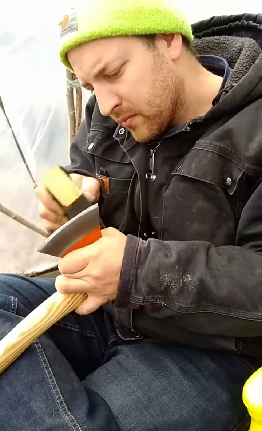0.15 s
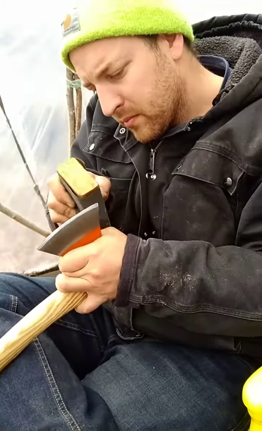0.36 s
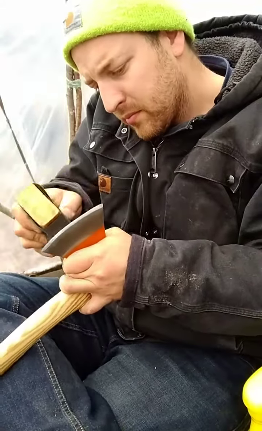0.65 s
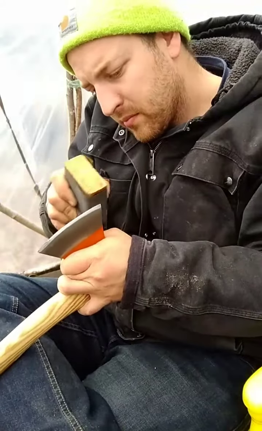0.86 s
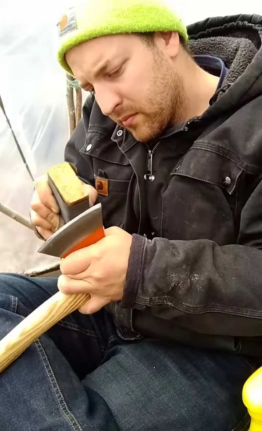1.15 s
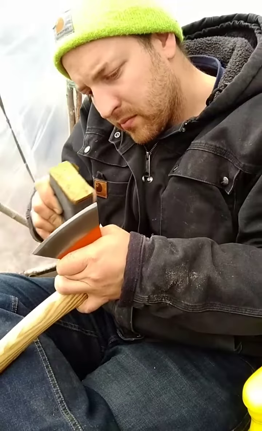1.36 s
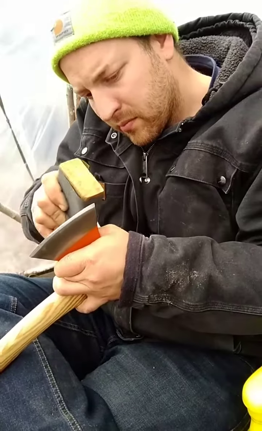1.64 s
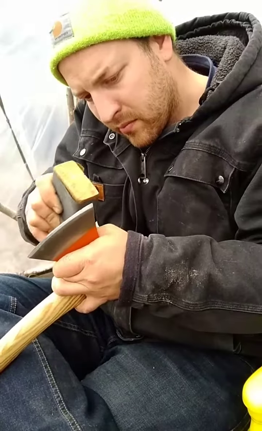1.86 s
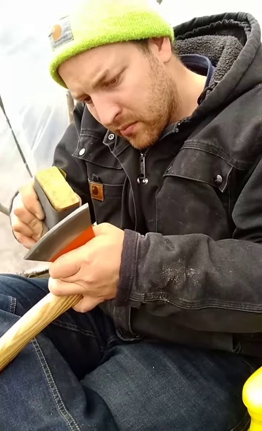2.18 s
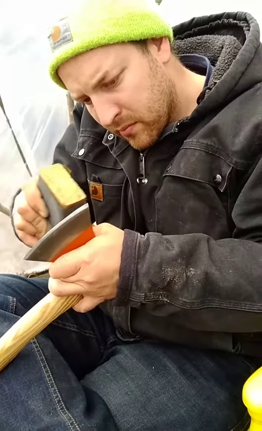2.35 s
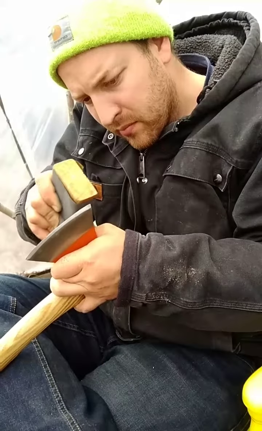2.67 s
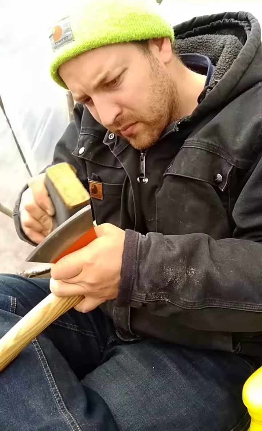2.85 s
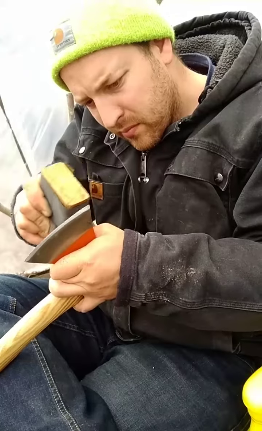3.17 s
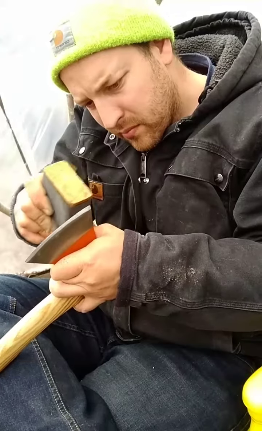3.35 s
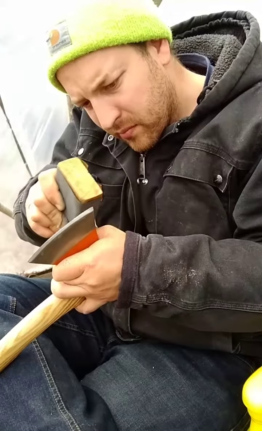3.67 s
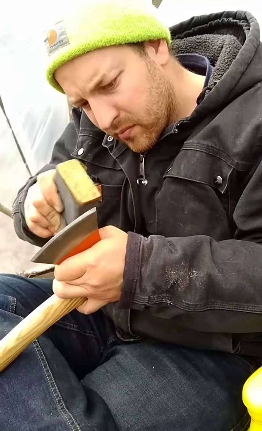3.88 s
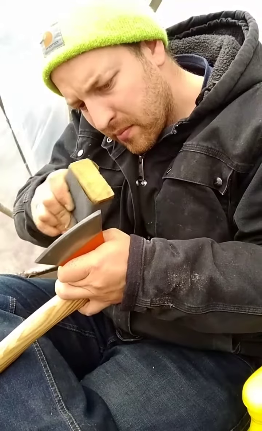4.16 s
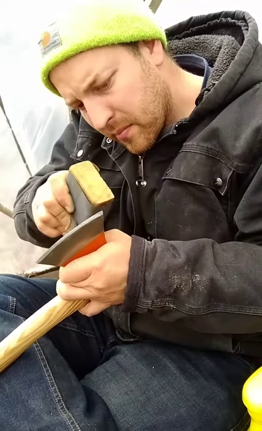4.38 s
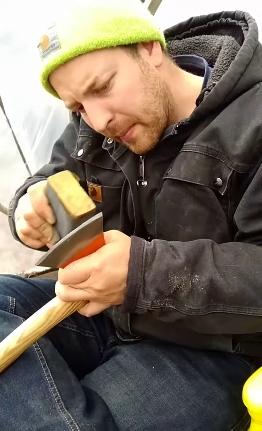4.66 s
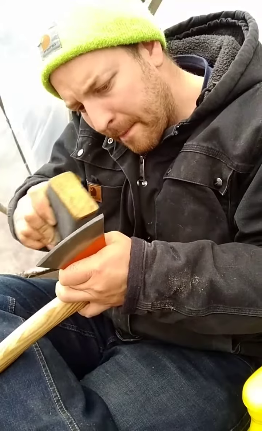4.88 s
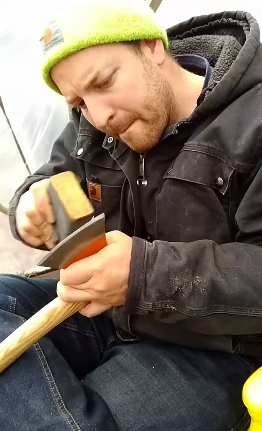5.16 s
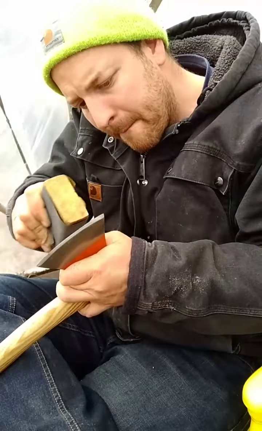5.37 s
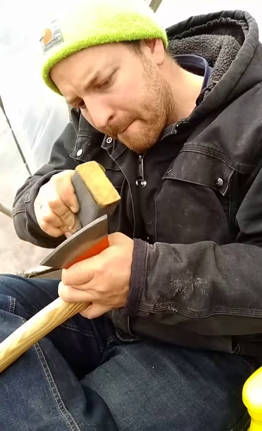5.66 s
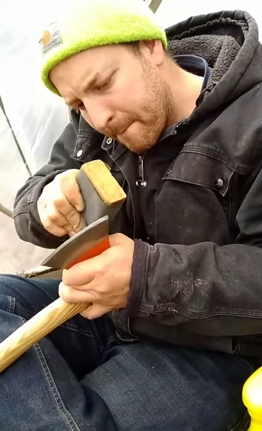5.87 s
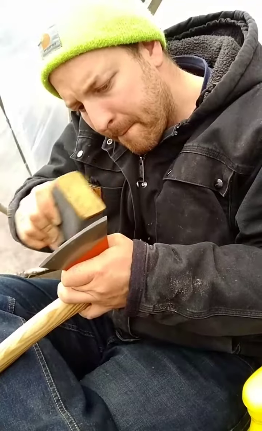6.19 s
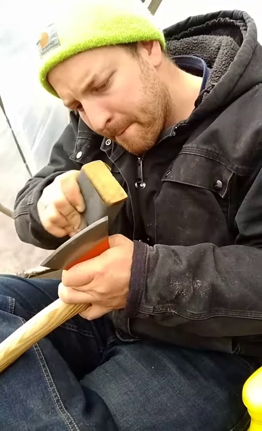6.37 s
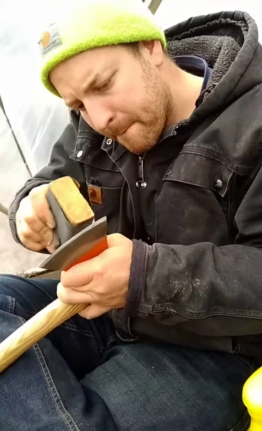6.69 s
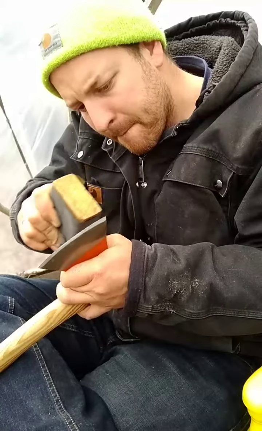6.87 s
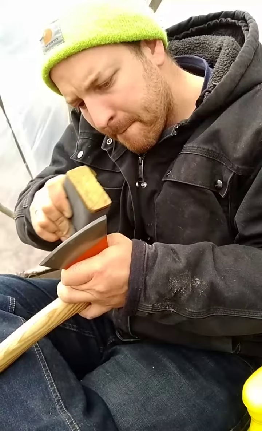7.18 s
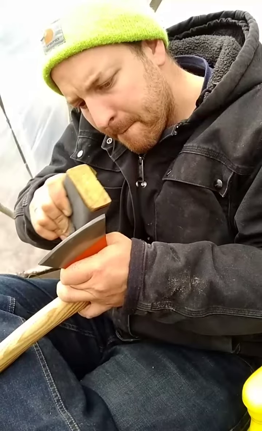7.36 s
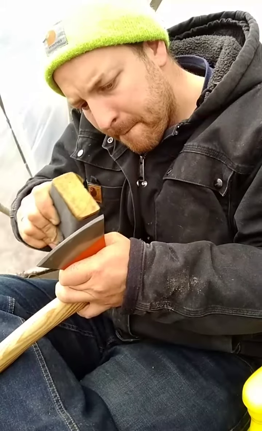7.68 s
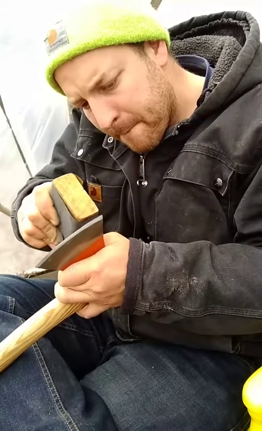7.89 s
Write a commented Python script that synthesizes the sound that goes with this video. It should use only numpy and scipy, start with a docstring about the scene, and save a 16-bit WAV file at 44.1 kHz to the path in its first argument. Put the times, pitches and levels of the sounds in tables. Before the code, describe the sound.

A close, dry outdoor sound under a tarpaulin, with quiet air behind. From 0 to 1.2 seconds a whetstone makes a few longer, uneven hissing strokes on an axe edge, with a weak gap near 0.4, over a faint low engine hum far away. From about 1.3 the strokes become rapid and regular, roughly ten a second, strong, bright and gritty, with tiny crackles and stray ticks; the hum lurches briefly near 1.6, then fades almost completely by 4. Soft low thumps come now and then from 2 to 6.5. Around 4 the strokes weaken and grow uneven, then from 5 alternate firm and faint. After 6.5 they are mostly light, thin and slightly singing, partly recovering at the end. The engine returns from 5, swells to a boomy, wavering drone from 6.3 to 7.6, then sinks quickly before 8.

```python
"""Under a tarpaulin shelter outdoors, a hand-held whetstone is stroked back and forth along an axe edge,
soon about ten strokes a second. Each stroke is filtered noise and tiny clicks, for breaking grit, that swells
with the stone's speed. Coarse grains catch with a tick, and there are short low thumps and lumps of hum.
Outside, over quiet air, a distant engine hums with wavering sines and rumbling noise: it fades, comes nearer
late on, and sinks again at the very end."""
import sys
import numpy as np
from scipy import signal
from scipy.fft import rfft, irfft, next_fast_len
from scipy.io import wavfile
from scipy.ndimage import uniform_filter1d, map_coordinates

SR = 44100
rng = np.random.default_rng(int(sys.argv[2]) if len(sys.argv) > 2 else 0)


def int16_out(signal):
    """Quantize to a 16-bit WAV file."""
    q = np.round(np.clip(np.atleast_2d(signal).T, -1, 1) * 32767)
    wavfile.write(sys.argv[1], SR, q.astype(np.int16))


N = 354123
TIME = np.arange(N) / SR

# Colours give only the shape of a spectrum; the overall level is set elsewhere.
# colour of still air: [f/Hz, level/dB per Hz]
AIR_COLOUR = [(20, -7.5), (50, -2), (95, 8), (150, -3.5), (200, -1.5), (300, -8.5), (420, -13), (600, -14),
              (1000, -13.5), (1700, -14.5), (2400, -23), (3200, -31), (7000, -24), (12000, -11.5)]
# colour of a soft low rush that comes and goes: [f/Hz, level/dB per Hz]
RUSH_COLOUR = [(150, -1), (300, -4), (420, -1.5), (550, -11), (750, -6), (1000, -22), (1600, -35)]
# loudness of that rush: [t/s, level/dB]
RUSH_LEVEL = [(0, -75.5), (1, -106), (6.7, -73), (7.4, -86), (7.8, -71), (8.03, -75)]
# distant engine: [t/s, firing rate f/Hz, level/dB]
ENGINE_PATH = [(0, 98.2, -65), (.9, 99, -67.5), (1.7, 95.2, -72), (2, 93, -81), (4, 93.5, -93),
               (5.2, 86.6, -74.5), (5.8, 85.9, -70), (6.24, 87.5, -62.5), (6.349, 87.6, -51.5),
               (6.899, 95, -49.5), (7.66, 99.9, -51), (7.82, 98.7, -65.5), (8.03, 99.8, -67)]
# engine harmonics: [multiple of the firing rate, level/dB before flutter and thinning]
ENGINE_HARMONICS = [(2, -18), (3, -30.5), (4, -30), (6, -49)]
# colour of the engine's rumble: [f/Hz, level/dB per Hz]
RUMBLE_COLOUR = [(25, -15), (55, -1), (90, -3.5), (130, 8.5), (160, -6.5), (200, 7), (250, -13),
                 (420, -8.5), (480, -30), (550, -13.5), (800, -46), (2000, -74)]
# abrupt swells of the hum, before their edges are smoothed: [start t/s, end t/s, lift level/dB]
HUM_SURGES = [(1.57, 1.622, 15), (1.631, 1.684, 18), (6.473, 6.491, 12.5), (6.668, 6.71, 8),
              (6.8, 6.934, 9.5), (7.038, 7.098, 8.5), (7.162, 7.271, 8.5), (7.653, 7.684, 11.5)]
# short low thumps and lumps of hum: [t/s, peak level/dB of the main tone, f/Hz]
LOW_BUMPS = [(2.08, -66.5, 133), (2.34, -61.5, 99), (2.95, -66, 97.36), (3.121, -64, 127),
             (3.73, -63.5, 96), (4.441, -66, 99.5), (4.801, -73, 136), (5.631, -55, 108.5),
             (5.82, -65, 191), (6.105, -53, 89), (6.53, -61, 200.3)]
# colour of grit on steel: [f/Hz, level/dB per Hz]
GRIT_COLOUR = [(300, -63), (1000, -42), (2300, -43.5), (2750, -36.5), (3100, -24.5), (4300, -26.5),
               (4850, -26.5), (5150, -16), (6500, -14), (7400, -12.5), (8700, -7.5), (9600, -0.5),
               (10600, 6.5), (11700, 7.5), (12200, -7)]
# ringing of the gripped axe head: [f/Hz, width f/Hz, lift level/dB]
BLADE_RINGS = [(1870, 80, 3), (2690, 60, 3), (2816, 80, 4), (3175, 150, 5.5), (3780, 110, 4), (4550, 60, 4),
               (5895, 120, 2), (6540, 150, 2.5), (8284, 80, 2), (11800, 130, 1.8)]
# coarse grains catching on the edge: [t/s, level/dB before the common level_db of catches()]
GRAIN_CATCHES = [(0.1565, -23), (0.823, -22), (0.8934, -21), (0.8974, -17), (0.9592, -22), (1.6591, -19),
                 (2.4064, -20), (2.5072, -16), (2.615, -22), (2.9472, -23), (3.242, -25), (3.4491, -19),
                 (3.649, -22), (5.4924, -23), (6.1379, -28), (6.5316, -21), (7.229, -27), (7.637, -30)]
# strokes, each lasting until the next: [turn of the stone t/s, level/dB, dullness from its angle level/dB]
STROKES = [(-0.075, -37.5, -6), (0.079, -35, -0.5), (0.357, -58.5, -14), (0.446, -37.5, 6.5),
           (0.792, -34, -4.5), (1.02, -34, 4.5), (1.197, -36.5, 3), (1.313, -29.5, 6.5),
           (1.412, -30.5, 5.5), (1.534, -33.5, 5.5), (1.639, -32.5, 3.5), (1.747, -29.5, 4.5),
           (1.859, -33, 8), (1.964, -32.5, 5.5), (2.066, -34, 6), (2.174, -32.5, 2.5), (2.274, -31.5, 7),
           (2.376, -33.0, 4.5), (2.477, -33, 5), (2.586, -33.5, 1), (2.689, -37.5, 4.5),
           (2.798, -38.5, -0.5), (2.899, -36, 5.5), (3.001, -34.5, -2.5), (3.103, -46, -4),
           (3.216, -33.0, 4.5), (3.312, -34, 2.5), (3.417, -30.5, 5), (3.519, -40, 1), (3.628, -34, 2),
           (3.726, -38.5, 2), (3.836, -34.5, 2.5), (3.937, -49, -5.5), (4.053, -41, 1.5),
           (4.149, -49.5, 5.5), (4.264, -54.5, -7), (4.367, -36, 2.5), (4.483, -38, -2), (4.585, -40, -1),
           (4.694, -35, -4.5), (4.802, -36.5, 2), (4.903, -33.5, -13.5), (5.015, -47, -8.5),
           (5.13, -31, -1.5), (5.236, -48.5, -2.5), (5.355, -34.5, -0.5), (5.463, -37, 0.5),
           (5.571, -30.5, 4.5), (5.676, -39.5, -1.5), (5.794, -33.0, -0.5), (5.895, -44, 1.5),
           (6.016, -31, 2), (6.118, -49, -5.5), (6.238, -36, -3.5), (6.358, -57.5, -8.5),
           (6.469, -33.5, -4.5), (6.583, -55, -7.5), (6.689, -54.5, -7.5), (6.796, -57.0, -4.5),
           (6.9, -49.5, 0), (6.999, -57, -1), (7.107, -43.5, -6.5), (7.206, -44.5, 0), (7.302, -55, -11),
           (7.403, -56.5, -4), (7.5, -58.5, -8), (7.613, -42.5, 2), (7.703, -45, -11), (7.812, -41.5, 0.5),
           (7.911, -40.5, 2)]
# the edge sings during the stroke under way at this time: [t/s, f/Hz, height level/dB]
EDGE_SINGS = [(4.2, 8450, 8), (5.29, 8770, 9), (6.52, 6870, 12.5), (6.95, 8400, 15), (7.15, 8400, 13.5),
              (7.35, 8540, 12)]
# colour of the stone block's hollow rasp: [f/Hz, level/dB per Hz]
HOLLOW_COLOUR = [(400, -22), (900, -8), (1200, -11.5), (1700, 3.5), (2000, -2), (2400, -9), (3100, 6.5),
                 (4200, 1), (5000, -9.5)]
# loudness of the rasp, before hollow_db of strokes() is added: [t/s, level/dB]
RASP_LEVEL = [(0, -93), (.9, -95), (1.1, -77.5), (1.25, -69.5), (1.55, -63), (1.9, -82), (2.8, -95),
              (2.95, -75), (3.35, -68), (3.6, -83.5), (4.4, -74.5), (4.75, -73), (5.55, -76), (6.1, -80.5),
              (8, -78.5)]

AIR_DB = -67.5
LAST_TURN_S = 8.02  # end of the last stroke
# the hand is slow to change its pressure: part of one stroke's force carries into the next
CARRY, CARRY_S = 0.79, 0.016
# on a long stroke the push eases off after a first hold
HOLD_S, SAG_DB_PER_S = 0.086, 29
# a firm stroke is bright and a light one dull
FIRM_DB, DULL_DB, DULL_PER_DB = -33.5, -3.5, 0.977
# as the work goes on, the scrape below its brightest part thins and the blade rings more
THINNING_DB_PER_S, RING_DB_PER_S, HALFWAY_S = 1, 1.2, 5.03
# speeding up and braking of one stroke; CREEP is the lowest speed, as a share of full speed
ATTACK_S, BRAKE_SHARE, BRAKE_MAX_S, CREEP, STICK_S, BITE_S = 0.041, 0.49, 0.07, 0.16, 0.0052, 0.0025


def gain_of(db):
    """Turns decibels into amplitude."""
    return 10 ** (np.asarray(db) / 20)


def evened(x):
    """Scales x to an average (rms) strength of 1."""
    return x / np.sqrt(np.mean(x ** 2) + 1e-20)


def read(points, hz):
    """Reads a colour table between its points, on a log-frequency axis."""
    f, value = np.transpose(points)
    return np.interp(np.log(hz + 1), np.log(f + 1), value)


def level_at(points, t):
    """Reads a level table at time t, with straight lines between its points."""
    return np.interp(t, *np.transpose(points))


def coloured(x, colour):
    """Filters x by colour(hz) in dB and evens the result."""
    size = next_fast_len(len(x))
    hz = np.fft.rfftfreq(size, 1 / SR)
    spectrum = rfft(x, size) * gain_of(colour(hz))
    return evened(irfft(spectrum, size)[:len(x)])


def coloured_noise(points):
    """Makes steady noise with the colour of a table."""
    return coloured(rng.standard_normal(N), lambda hz: read(points, hz))


def wander(axis, step):
    """Drifts smoothly and at random, with a new value every step along the axis."""
    place = (axis - axis[0]) / step
    return map_coordinates(rng.standard_normal(4096), [place], order=2, mode="wrap")


def shifting(x, depth_db, patch_s, patch_hz):
    """Lays patches of random lift and cut over x, drifting in time and pitch as under a moving contact."""
    hz, t, z = signal.stft(x, SR, nperseg=512, noverlap=384)
    place = np.meshgrid(hz / max(patch_hz, 60), t / max(patch_s, .008), indexing="ij")
    field = map_coordinates(rng.standard_normal((400, 1024)), place, order=2, mode="wrap")
    _, patched = signal.istft(z * gain_of(depth_db * field), SR, nperseg=512, noverlap=384)
    return evened(patched[:N])


def add(mix, s, sound):
    """Mixes a sound in at s seconds, cutting off what lies outside the scene."""
    start = round(s * SR)
    sound = sound[max(-start, 0):]
    part = mix[max(start, 0):][:len(sound)]
    part += sound[:len(part)]


def air():
    """Still outdoor air and a soft low rush that comes and goes: two layers of filtered noise."""
    still = shifting(coloured_noise(AIR_COLOUR), depth_db=4.0, patch_s=0.055, patch_hz=105.8)
    rush = coloured_noise(RUSH_COLOUR)
    return gain_of(AIR_DB) * still + gain_of(level_at(RUSH_LEVEL, TIME)) * rush


def engine(waver=0.00844, flutter_db=2.5, overtone_flutter_db=4.0, near_db=-52, thinning=0.47,
           rumble_db=-13, surge_share=0.66):
    """A low hum at the wavering firing rate, with weak harmonics and a rumble that follows its level."""
    s, rate_hz, db = np.transpose(ENGINE_PATH)
    level_db = np.interp(TIME, s, db)
    wavering_hz = np.interp(TIME, s, rate_hz) * (1 + waver * wander(TIME, 0.032))
    turns = np.cumsum(wavering_hz) / SR

    steps_db = sum(lift * ((TIME > a) & (TIME < b)) for a, b, lift in HUM_SURGES)
    surge_db = uniform_filter1d(steps_db * 1., size=500)  # rounds the steps over 500 samples
    hum = gain_of(surge_db + flutter_db * wander(TIME, 0.045)) * np.sin(2 * np.pi * turns)

    overtones = np.zeros(N)
    for multiple, overtone_db in ENGINE_HARMONICS:
        flutter = gain_of(overtone_db + overtone_flutter_db * wander(TIME, 0.076))
        overtones += flutter * np.sin(2 * np.pi * round(multiple) * turns)
    # the harmonics count for more in the faint hum, which sounds thinner; the loud one is boomier
    overtones *= gain_of(thinning * (near_db - level_db))

    rumble = shifting(coloured_noise(RUMBLE_COLOUR), depth_db=5.5, patch_s=0.074, patch_hz=99.6)
    rumble *= gain_of(rumble_db + surge_share * surge_db)
    return gain_of(level_db) * (hum + overtones + rumble)


def shelter(x, t60=.28, wet_db=-18):
    """Adds a short, faint tail from the tarpaulin walls: scattered echoes that fall 60 dB in t60 seconds."""
    t = TIME[:SR // 2]
    echoes = rng.choice([-1, 1], len(t)) * (rng.random(len(t)) < 2000 / SR)  # about 2000 a second
    tail = echoes * (t > .003) * gain_of(-60 * t / t60)
    return x + gain_of(wet_db) * signal.fftconvolve(x, tail / np.linalg.norm(tail))[:N]


def low_bumps(rise_s=0.018, overtone=1.77, overtone_db=-10):
    """A low thump lasts a few cycles: two sines that swell and die away together."""
    out, t = np.zeros(N), TIME[:SR // 4]
    swell = (t / rise_s * np.exp(1 - t / rise_s)) ** 2
    for s, db, hz in LOW_BUMPS:
        main = np.sin(2 * np.pi * hz * t)
        upper = gain_of(overtone_db) * np.sin(2 * np.pi * overtone * hz * t)
        add(out, s, gain_of(db) * swell * (main + upper))
    return out


def steel_db(hz):
    """Gives the grit colour with the resonances of the axe head on top."""
    ringing = sum(db / (1 + (2 * (hz - f) / width) ** 2) for f, width, db in BLADE_RINGS)
    return read(GRIT_COLOUR, hz) + ringing


def catches(decay_s=.0045, rise_s=.0004, level_db=-7):
    """A coarse grain snags and crumbles in a few milliseconds: a short burst of steel-coloured noise."""
    out, t = np.zeros(N), np.arange(2048) / SR
    burst = np.exp(-t / decay_s) * (1 - np.exp(-(t / rise_s) ** 2))
    for s, db in GRAIN_CATCHES:
        crumble = coloured(rng.standard_normal(len(t)), steel_db)
        add(out, s, gain_of(db + level_db) * crumble * burst)
    return out


def grit(per_s=3600, spread_db=-0.5, powder=1.0, grabs_per_s=70, grab_db=0.5, grab_s=0.018):
    """Clicks of breaking grains over the hiss of fine powder; the stone grabs suddenly and eases off."""
    size = gain_of(spread_db * np.minimum(rng.exponential(1, N), 4))
    clicks = size * rng.choice([-1, 1], N) * (rng.random(N) < per_s / SR)
    grab_starts = 1. * (rng.random(N) < grabs_per_s / SR)
    grabs = signal.lfilter([1], [1, -np.exp(-1 / (grab_s * SR))], grab_starts)
    grains = evened(clicks) + powder * rng.standard_normal(N)
    grains *= gain_of(grab_db * 2 * np.tanh(grabs / 2))  # tanh limits grabs that pile up
    # each clump of grit has its own pitch
    clumped = shifting(grains, depth_db=1.5, patch_s=.011, patch_hz=1324)
    return shifting(clumped, depth_db=2.5, patch_s=.04, patch_hz=298.6)


def stone_speed(t, length):
    """One stroke, up to 1: the stone sticks briefly at the turn, bites, gathers speed, holds it and brakes."""
    brake_s = min(BRAKE_SHARE * length, BRAKE_MAX_S)
    bite = np.clip((t - STICK_S) / BITE_S, 0, 1)
    attack = np.sin(np.pi / 2 * np.clip(t / ATTACK_S, 0, 1)) * bite
    release = np.sin(np.pi / 2 * np.clip((length - t) / brake_s, 0, 1)) ** 2
    return CREEP + (1 - CREEP) * attack * release


def strokes(contact_width_hz=900, bright_hz=10500, dull_span_hz=7000, low_swell=1.0, split_hz=5000, hollow_db=3,
            ring_hz=3200, ring_width_hz=500, ring_db=2.5, hiss_hz=9300, top_swell=1.42):
    """Grit noise swells with the stone's speed; the hand's force and the stone's angle set level and colour."""
    out, grains = np.zeros(N), grit()
    below = signal.butter(3, split_hz, fs=SR, output="sos")
    above = signal.butter(3, hiss_hz, "high", fs=SR, output="sos")
    # low down the steel has few modes, and they come and go as the contact travels
    coarse = shifting(grains, depth_db=6.5, patch_s=.08, patch_hz=149.8)
    grains = grains + signal.sosfiltfilt(below, coarse - grains)
    ends = [row[0] for row in STROKES[1:]] + [LAST_TURN_S]
    before_db = STROKES[0][1]
    for (s, db, angle_db), end in zip(STROKES, ends):
        start = round(s * SR)
        t = np.arange(round(end * SR) - start) / SR
        speed = stone_speed(t, end - s)
        carried_db = CARRY * (before_db - db) * np.exp(-t / CARRY_S)
        force_db = db + carried_db - SAG_DB_PER_S * np.maximum(t - HOLD_S, 0)
        late_s = s - HALFWAY_S
        dull_db = DULL_DB + angle_db - DULL_PER_DB * (db - FIRM_DB) - THINNING_DB_PER_S * late_s
        drive = np.take(grains, start + np.arange(len(t)), mode="wrap")

        def colour(hz):
            """Tilts the steel colour by force and angle, and lifts the singing edge and the blade's low ring."""
            tilt = dull_db * np.clip((bright_hz - hz) / dull_span_hz, 0, 1)
            singing = sum(height * np.exp(-((hz - f) / contact_width_hz) ** 2)
                          for at, f, height in EDGE_SINGS if s <= at < end)
            ring_lift = ring_db + RING_DB_PER_S * late_s
            ring = ring_lift * np.exp(-((hz - ring_hz) / ring_width_hz) ** 2)
            return steel_db(hz) + tilt + singing + ring

        scrape = coloured(drive, colour)
        low = signal.sosfiltfilt(below, scrape)
        top = signal.sosfiltfilt(above, scrape)
        middle = scrape - low - top
        # the top hiss needs speed, so the turns sound duller than the middle of a stroke
        moving = top * speed ** top_swell + middle * speed + low * speed ** low_swell
        rasp_db = hollow_db + level_at(RASP_LEVEL, (s + end) / 2)
        hollow = coloured(drive, lambda hz: read(HOLLOW_COLOUR, hz))
        rasp = gain_of(rasp_db) * hollow * speed ** low_swell
        add(out, s, gain_of(force_db) * moving + rasp)
        before_db = db
    return out


def scene():
    """Stone on steel close by, the engine far off."""
    sharpening = shelter(strokes() + catches())
    return (air() + engine() + low_bumps() + sharpening)[None]


def record(dry, edge_hz=12220):
    """The recorder's band limit: a steep filter removes what lies above edge_hz."""
    band = signal.firwin(401, edge_hz, window=("kaiser", 8), fs=SR)
    return signal.oaconvolve(dry, band[None], "same")


dry = scene()
out = record(dry)
int16_out(out)
```